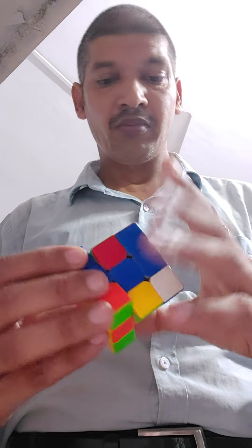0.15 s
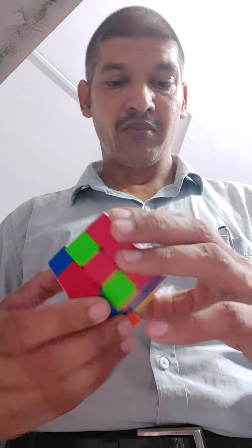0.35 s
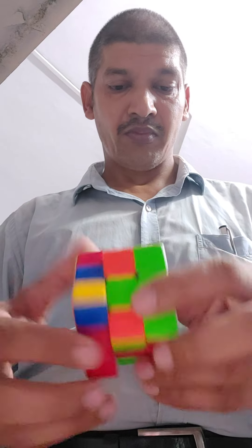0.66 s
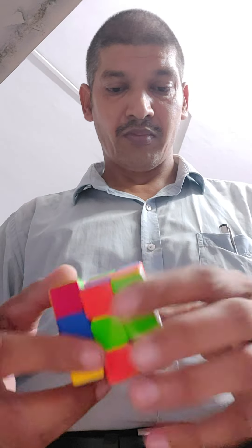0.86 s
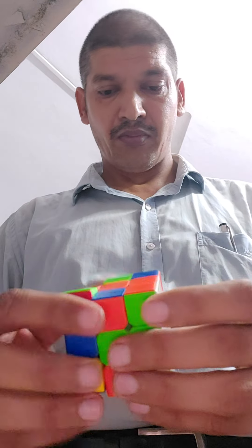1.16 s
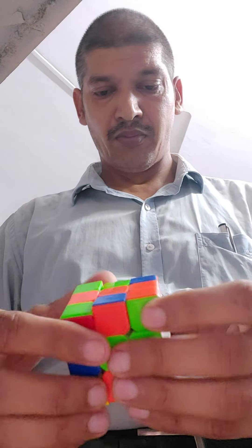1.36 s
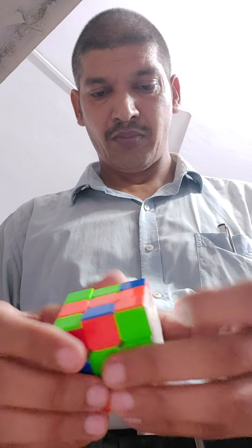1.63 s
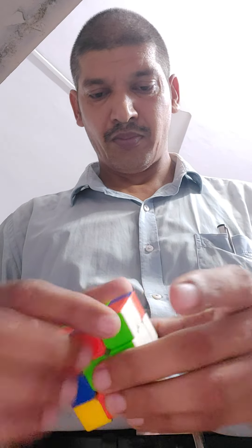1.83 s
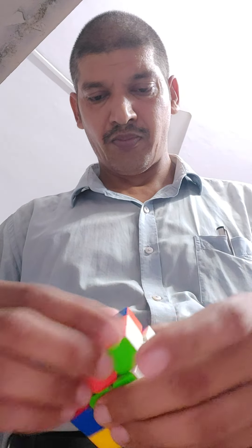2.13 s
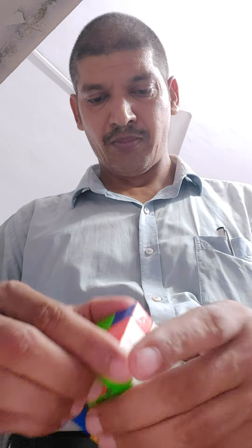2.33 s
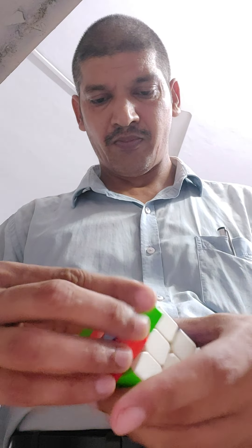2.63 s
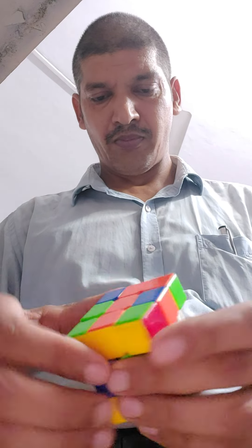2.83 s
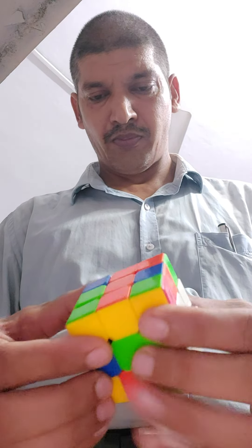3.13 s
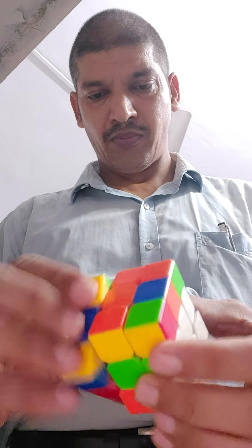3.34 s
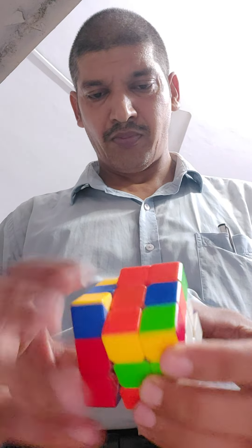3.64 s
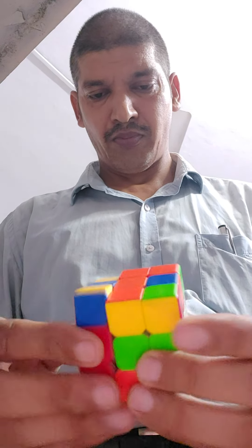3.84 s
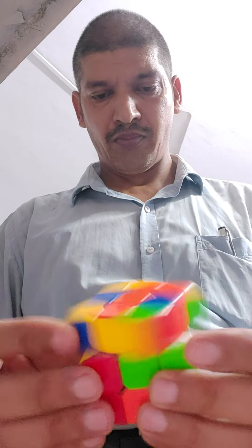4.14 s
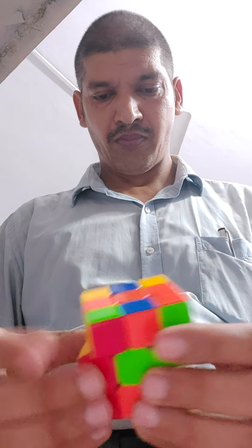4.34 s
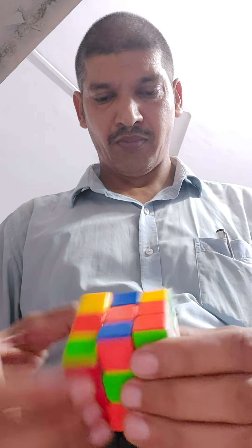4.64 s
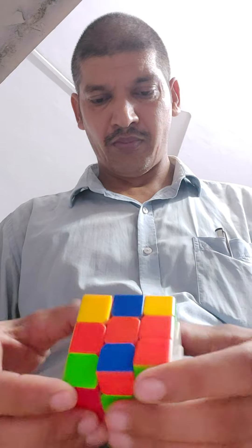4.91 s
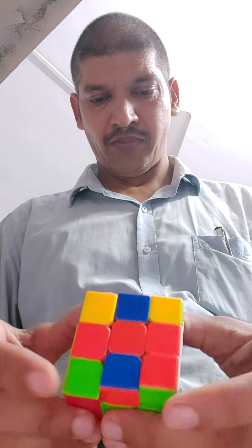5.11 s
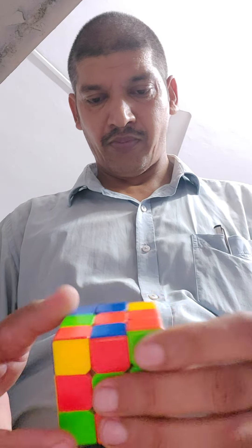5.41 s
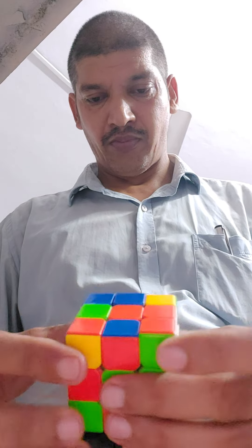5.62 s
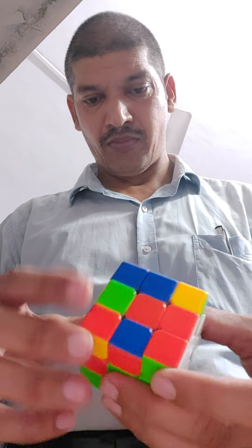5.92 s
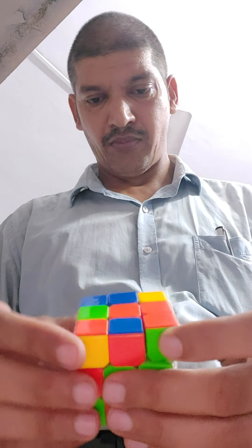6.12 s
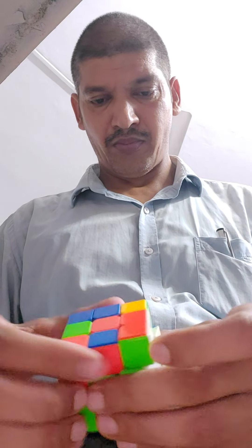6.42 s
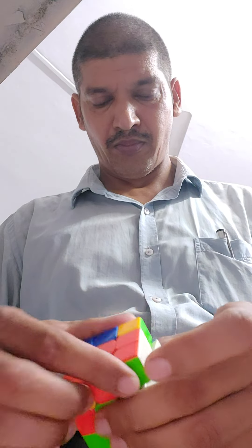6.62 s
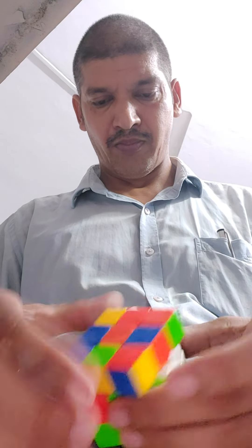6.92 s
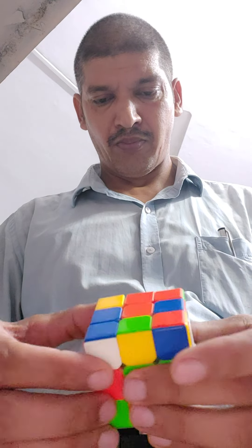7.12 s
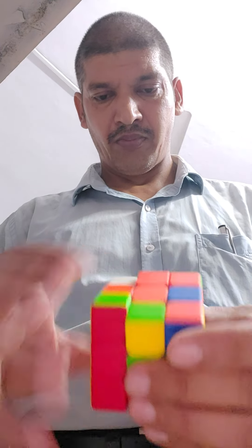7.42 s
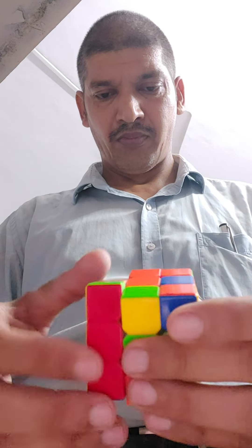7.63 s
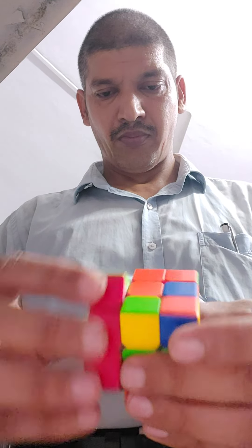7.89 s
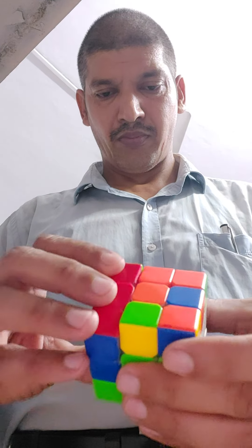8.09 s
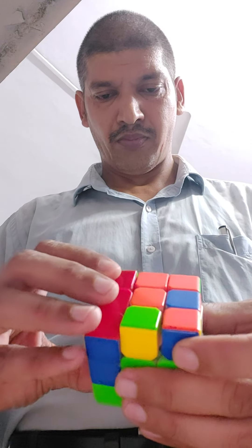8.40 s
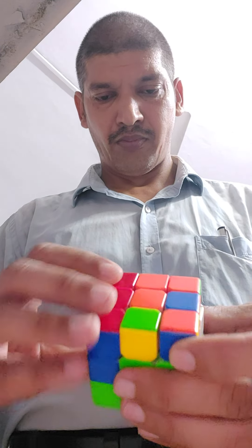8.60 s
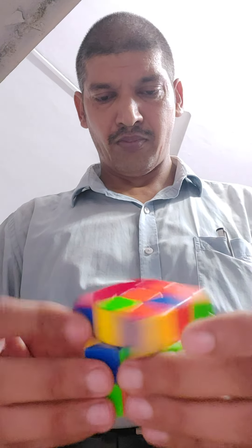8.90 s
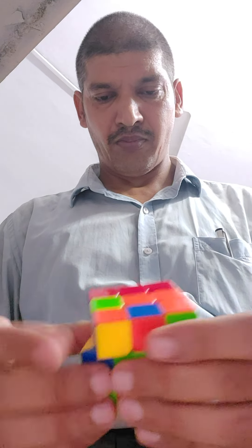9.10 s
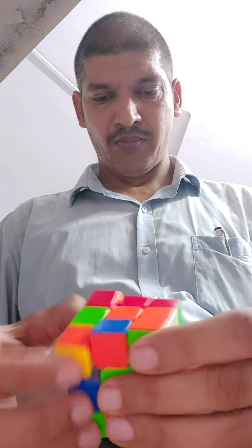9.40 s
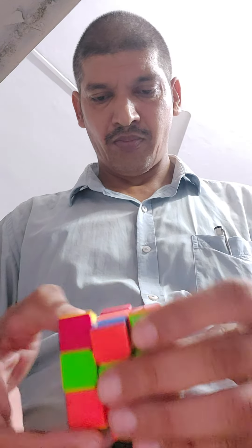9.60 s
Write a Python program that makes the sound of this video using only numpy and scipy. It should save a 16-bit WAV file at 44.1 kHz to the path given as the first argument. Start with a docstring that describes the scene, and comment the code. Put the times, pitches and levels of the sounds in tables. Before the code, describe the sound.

Very close to the microphone, hands turn a plastic puzzle cube. Bright, hollow clacks and brief dry scrapes come in irregular bursts, with an especially sharp snap near 1.6 seconds, busy turning from two to five, sparser clicks around six and eight, and a strong final flurry. A small hard room adds short reflections, and a fan hums low and steady underneath. The cube sits toward the right.

```python
"""A plastic puzzle cube is twisted by hand just above a phone in a small hard room.
Clacks are short noise rattles, scrapes are dense random grains; ticks are small clacks that follow the scrapes.
All ring the resonances of the hollow pieces, and four walls return diffuse tails.
A fan adds air noise and wavering drones in the low room resonances. The right port is nearer the cube."""
import sys
import numpy as np
from scipy import signal
from scipy.fft import rfft, irfft, next_fast_len
from scipy.io import wavfile
from scipy.ndimage import uniform_filter1d

SR = 44100
rng = np.random.default_rng(int(sys.argv[2]) if len(sys.argv) > 2 else 0)


def generate_wav(signal):
    """Clip the signal to [-1, 1] and save it as 16-bit WAV at the path in sys.argv[1]."""
    frames = np.transpose(np.atleast_2d(signal))
    scaled = np.clip(frames, -1, 1) * 32767
    pcm = np.round(scaled).astype(np.int16)
    wavfile.write(sys.argv[1], SR, pcm)


N = 429975  # samples

# fan drones in the room resonances: (centre [Hz], width [Hz], rms level at the right port [dB])
DRONES = [(100.54, 8.04, -48), (104, 8.1, -54), (114.4, 12, -51), (156.8, 8, -52), (197.1, 10, -55),
          (464, 20, -76), (668, 14, -75.5), (855, 14, -83.5)]
# spectrum of the fan's air noise: (frequency [Hz], relative density [dB])
AIR_SPECTRUM = [(20, -27), (34, -14), (50, -5), (90, 2), (180, 1.5), (300, -10.5), (500, -18.5), (900, -29),
                (1300, -42), (1700, -43), (3200, -50.5), (4200, -46), (6500, -45), (9500, -50),
                (16000, -45)]
# scrapes of a turning layer: (start [s], swell [s], fade [s], level [dB])
TURN_SCRAPES = [(0.364, 0.053, 0.049, -57), (0.5, 0.047, 0.053, -72.5), (0.701, 0.04, 0.017, -51),
                (0.846, 0.029, 0.047, -51), (1.04, 0.026, 0.033, -67), (1.095, 0.065, 0.025, -56),
                (1.279, 0.061, 0.093, -55), (1.491, 0.051, 0.022, -57), (1.534, 0.064, 0.026, -49.5),
                (1.63, 0.0079, 0.015, -30.5), (1.99, 0.031, 0.044, -52.5), (2.047, 0.03, 0.085, -40),
                (2.226, 0.019, 0.049, -48.5), (2.29, 0.014, 0.096, -47), (2.495, 0.045, 0.03, -57),
                (2.558, 0.059, 0.016, -40.5), (2.63, 0.021, 0.036, -36), (2.685, 0.022, 0.044, -38),
                (2.94, 0.03, 0.033, -58.5), (2.985, 0.016, 0.015, -44.5), (3.05, 0.033, 0.17, -49.5),
                (3.31, 0.13, 0.038, -40), (3.585, 0.025, 0.055, -35), (3.851, 0.023, 0.06, -53),
                (3.948, 0.034, 0.013, -53.5), (4.086, 0.042, 0.025, -63), (4.21, 0.073, 0.023, -35.5),
                (4.554, 0.027, 0.027, -45.5), (4.695, 0.073, 0.035, -40), (4.936, 0.021, 0.034, -41.5),
                (4.99, 0.02, 0.058, -54), (5.132, 0.011, 0.029, -48.5), (5.264, 0.076, 0.062, -39.5),
                (5.645, 0.011, 0.02, -66.5), (5.815, 0.014, 0.06, -73), (6.205, 0.041, 0.022, -52),
                (6.484, 0.027, 0.029, -46), (6.63, 0.041, 0.06, -67.5), (6.73, 0.011, 0.034, -63.5),
                (6.811, 0.02, 0.12, -42), (7.177, 0.028, 0.041, -44.5), (7.363, 0.077, 0.045, -38),
                (7.89, 0.0096, 0.04, -69.5), (7.962, 0.11, 0.049, -45.5), (8.39, 0.027, 0.016, -65.5),
                (8.427, 0.045, 0.011, -51), (8.545, 0.016, 0.061, -56.5), (8.68, 0.0075, 0.036, -62),
                (8.797, 0.042, 0.031, -66), (8.956, 0.032, 0.014, -46), (8.986, 0.056, 0.033, -37.5),
                (9.08, 0.11, 0.2, -69), (9.308, 0.027, 0.059, -42.5), (9.398, 0.053, 0.04, -53.5),
                (9.461, 0.037, 0.12, -46), (9.565, 0.022, 0.049, -30.5), (9.686, 0.024, 0.034, -40.5),
                (9.734, 0.023, 0.0055, -40)]
# resonances of the hollow pieces: (centre [Hz], width [Hz], relative level [dB])
PIECE_MODES = [(443, 390, -16), (744, 158, -5), (973, 155, -5), (1434, 305, -1), (2010, 860, 0),
               (2765, 1110, -0.5), (3620, 680, 0), (5440, 1640, 4), (6100, 1580, 6), (7210, 1250, 1),
               (8520, 310, -2.5), (10000, 3800, -2.5), (13800, 2300, -0.5), (15400, 280, 0.5)]
# room decay by 60 dB: (frequency [Hz], time [s])
ROOM_DECAY = [(500, 0.91), (2000, 0.5), (6000, 0.46), (12000, 0.41)]
# pieces snapping past each other: (time [s], blow level [dB], hollow knock under 2 kHz [dB])
SNAPS = [(0.013, -36.5, -23), (0.2456, -50.5, -30), (0.3412, -39.5, -15), (0.3798, -37.5, -22),
         (0.4127, -43, -5), (0.439, -41.5, -25), (0.673, -39.5, -25), (0.7435, -42, -8), (0.766, -42.5, -8),
         (0.8503, -24, -7), (0.86, -24, -10), (0.9356, -37.5, -9), (1.1034, -36, -20), (1.1242, -45, -12),
         (1.152, -42, 3), (1.2276, -37.5, -1.5), (1.496, -38, -6), (1.521, -37.5, -6), (1.571, -36, -10),
         (1.6331, -15, -11), (1.6413, -16.5, -11), (1.651, -25, -8.5), (1.96, -47.5, -8), (2.031, -44, -7),
         (2.1163, -28, -2), (2.1506, -34, 10), (2.172, -27, -22), (2.275, -36.5, -17), (2.302, -39, 10),
         (2.38, -51, -8), (2.4277, -41.5, -8), (2.474, -46, -2), (2.497, -40.5, -15), (2.5176, -34.5, -22),
         (2.5364, -35.5, -9), (2.563, -38, -6), (2.612, -34, -6), (2.655, -29, -4), (2.6925, -29, -11),
         (2.7046, -23.5, 1), (2.787, -29, 1), (2.7945, -36.5, -10), (2.81, -44, -1), (2.826, -51, -5),
         (2.9386, -46, -18), (3.0015, -36.5, -17), (3.059, -43.5, 9), (3.093, -37, 12), (3.135, -42, -2),
         (3.183, -40, 2), (3.283, -45.5, 8), (3.3628, -29, 2), (3.42, -37.5, 17), (3.4323, -28.5, -1),
         (3.4825, -33.5, -23), (3.4948, -35.5, -17), (3.5618, -32, 5), (3.5676, -31.5, 2),
         (3.595, -19, -19), (3.6236, -18.5, -5), (3.6964, -30, -23), (3.7045, -30.5, -5), (3.727, -43, 1),
         (3.743, -42, 13), (3.7572, -34.5, 7), (3.819, -47.5, 14), (3.8686, -27, -17), (3.911, -35.5, -20),
         (3.953, -33.5, -23), (3.9916, -35, -20), (4.0943, -40.5, 0), (4.1077, -42, -3), (4.129, -47, 12),
         (4.2352, -26.5, -8), (4.2752, -18, 1.5), (4.2783, -40, -18), (4.408, -33.5, -19),
         (4.5191, -22.5, -1), (4.693, -41, -24), (4.7187, -30.5, -16), (4.7847, -39, -4), (4.834, -36, 5.5),
         (4.9168, -43, -23), (4.9231, -39.5, 14.5), (4.9833, -21.5, 0), (5.005, -39, -16),
         (5.086, -38.5, -13), (5.1434, -41, -7), (5.3319, -25, 7), (5.3732, -36, -9), (5.383, -41, -18),
         (5.4, -47, -2), (5.465, -55, -5.5), (5.5424, -41.5, -1), (5.623, -47.5, 6.5),
         (5.797, -60.5, -19.5), (5.813, -52, -18), (6.021, -65.5, 7), (6.243, -25.5, 1), (6.311, -35.5, -5),
         (6.3345, -37.5, 4.5), (6.522, -41, 14.5), (6.593, -31, -16), (6.637, -51, 1), (6.7763, -46, -3),
         (6.8089, -38, -17), (6.8287, -26, -3), (6.877, -34, -2), (6.9288, -38, -19), (6.9534, -30.5, 6.5),
         (7.041, -41.5, -7), (7.1261, -36.5, -1), (7.1574, -37.5, 8), (7.2122, -41, -1),
         (7.3507, -40.5, -6), (7.3882, -25, -19), (7.422, -22.5, -20), (7.462, -24, -2.5),
         (7.5058, -25.5, -21.5), (7.9694, -38, -17), (8.188, -55.5, -10), (8.2961, -40.5, -15),
         (8.4982, -45, -4.5), (8.7277, -41.5, -12), (8.814, -40.5, -23), (8.899, -36, -2),
         (8.964, -45, -11), (9.019, -30, 3), (9.035, -27.5, 5.5), (9.06, -36, 12.5), (9.188, -40, 7),
         (9.2806, -36.5, 8.5), (9.4063, -43, -19), (9.441, -45, -15), (9.474, -24.5, -20),
         (9.4959, -24.5, -19), (9.5745, -25, 10), (9.5985, -17.5, 1), (9.6274, -16.5, 0), (9.692, -28, 5)]

AIR_DB = -50.5  # rms before the port tilt
ROOM_DB, WALLS = -11.5, 4
LEFT_LAG_S = 0.00004  # the left port hears the cube later
TOP_HZ = 15750
LOW_HZ, HIGH_HZ = 2000, 9000  # edges of the middle resonances
# scrape as a piece slides home: lead before the blow, swell, fade, level re the blow
SEAT_LEAD_S, SEAT_SWELL_S, SEAT_FADE_S, SEAT_DB = 0.0049, 0.007, 0.016, -19
SCRAPE_LOW_DB, SCRAPE_HIGH_DB = -6.5, -4.5  # bands under LOW_HZ and over HIGH_HZ
EDGE_DB, EDGE_SCATTER_DB = -12, 2  # edge tick over HIGH_HZ in a clack
PAN_DB, PAN_SCATTER_DB = -9, 2.5  # left minus right in a clack
# ticks: blow re the scrape level, hollow knock under LOW_HZ
TICKS_PER_S, TICK_DB, TICK_SCATTER_DB = 70, 0, 2
TICK_KNOCK_DB, TICK_KNOCK_SCATTER_DB = -3.5, 4.5
SETTLE_WINDOW_S, SETTLE_DB = 0.3, -12.5  # loose pieces tick faintly around each turn


def undb(db):
    """Amplitude ratio of a level in dB."""
    return 10 ** (np.asarray(db) / 20)


def level(x, db):
    """Scale to an rms level."""
    return x * undb(db) / np.sqrt(np.mean(x ** 2))


def on_log(hz, table):
    """Read a (Hz, value) table on a log-frequency axis."""
    table_hz, values = np.transpose(table)
    return np.interp(np.log(hz + 1), np.log(table_hz), values)


def mode(hz, centre_hz, width_hz):
    """Response of one resonance, 1 at its centre."""
    return 1j * hz * width_hz / (centre_hz ** 2 - hz ** 2 + 1j * hz * width_hz)


def shape(x, response):
    """Filter by a function of frequency."""
    size = next_fast_len(N + SR)
    hz = np.arange(size // 2 + 1) * SR / size
    return irfft(rfft(x, size) * response(hz), size)[..., :N]


def walk(rate_hz):
    """Random levels held 1 / rate_hz and slewed; spread near 1."""
    hold = int(SR / rate_hz)
    steps = np.repeat(rng.standard_normal(N // hold + 1), hold)
    return 1.2 * uniform_filter1d(steps, hold)[:N]


def fan(left_db=-1.5):
    """Air noise, alike at both ports only in the low notes, with narrow wavering drones."""
    mid, side = shape(rng.standard_normal((2, N)), lambda hz: undb(on_log(hz, AIR_SPECTRUM)))
    side = shape(side, lambda hz: np.abs(hz / (hz + 600j)) + 0.47 / (1 + (hz / 45) ** 2))
    air = level(np.array([mid + side, mid - side]), AIR_DB)
    air = shape(air, lambda hz: undb(np.array([[-3.5], [4.3]]) * hz / (hz + 500)))
    drone = 0
    for centre_hz, width_hz, db in DRONES:
        noisy = shape(rng.standard_normal(N), lambda hz: mode(hz, centre_hz, width_hz) ** 2)
        pitch_hz = centre_hz + 0.1202 * width_hz * walk(4)
        steady = np.sin(2 * np.pi * np.cumsum(pitch_hz) / SR)  # the motor's share holds its size
        drone = drone + level(level(noisy, -7.5) + 1.2 * steady, db)
    return air + drone * undb(np.array([[left_db], [0]]))


def sliding(rows, round_off=0.99):
    """How hard the faces rub: each row swells and fades with the speed of the twist."""
    t, push = np.arange(N) / SR, np.zeros(N)
    for start_s, swell_s, fade_s, db in rows:
        end_s = start_s + swell_s + fade_s
        span = slice(int(max(start_s, 0) * SR), int(end_s * SR))
        ramp = np.interp(t[span] - start_s, [0, swell_s, swell_s + fade_s], [0, 1, 0])
        push[span] += undb(db) * np.sin(np.pi / 2 * ramp) ** round_off
    return push


def scrape(push, alike=(0.8, 0.5, 0.3), pan_db=(-11, -10, -6), drift_db=1.07):
    """Dense stick-slip grains between the sliding faces ring the pieces in three bands."""
    slips_per_s, size_db, most, patchy_db, own_db = 6000, 3.0, 4, 1.8, 1.8
    slips = (rng.random((2, N)) < slips_per_s / SR) * rng.standard_normal((2, N))
    sizes = undb(size_db * np.minimum(rng.exponential(size=(2, N)), most))
    grains = level(slips * sizes * undb(patchy_db * (walk(70) + walk(250))), 0)
    bands = zip([SCRAPE_LOW_DB, 0, SCRAPE_HIGH_DB], alike, pan_db,
                [0, LOW_HZ, HIGH_HZ], [LOW_HZ, HIGH_HZ, SR])
    out = 0
    for part_db, share, pan, low_hz, high_hz in bands:
        def response(hz):
            return sum((-1) ** k * undb(db) * mode(hz, centre_hz, width_hz)
                       for k, (centre_hz, width_hz, db) in enumerate(PIECE_MODES)
                       if low_hz <= centre_hz < high_hz)
        unit = np.sqrt(np.mean(np.abs(response(np.linspace(0, SR / 2, 500))) ** 2))
        left = share * grains[0] + np.sqrt(1 - share ** 2) * grains[1]
        pair = np.array([left, grains[0]]) * undb(np.array([[pan], [-pan]]) / 2)
        # large and small parts catch at their own moments
        catch = undb(part_db + own_db * walk(120) + drift_db * walk(11))
        out = out + shape(pair * push * catch, response) / unit
    return out


def room(sends, first_s=0.0011):
    """Each wall returns its own diffuse tail to each port; the treble dies sooner."""
    t = np.arange(SR // 2 + SR // 4) / SR
    hz, s, tail = signal.stft(rng.standard_normal((2, WALLS, len(t))), SR, nperseg=256)
    decay = undb(-60 * s / on_log(hz, ROOM_DECAY)[:, None])
    tail = signal.istft(tail * decay, SR, nperseg=256)[1][..., :len(t)]
    tail = tail * (1 - np.exp(-t / first_s))
    tail = tail / np.sqrt(np.sum(tail ** 2, axis=(1, 2), keepdims=True))
    wet = signal.fftconvolve(sends[None], tail, axes=2).sum(axis=1)[:, :N]
    return undb(ROOM_DB + np.array([[-2.5], [2.5]])) * wet


def clacks(s, blow_db, low_db, rattle_s=0.0014, alike_hz=4000, scatter_db=2.5, detune=0.098):
    """Millisecond rattles of contacts ring other pieces each time. Rows: left, right, walls."""
    size, count = 1024, len(s)
    t, hz = np.arange(size) / SR, np.arange(size // 2 + 1) * SR / size
    noise = rng.standard_normal((count, 2 + WALLS, size))
    pitch, weight = rng.standard_normal((2, len(PIECE_MODES), 1 + WALLS, count, 1))
    edge, place = rng.standard_normal((2, count))
    high_db = EDGE_DB + EDGE_SCATTER_DB * edge
    pan_db = PAN_DB + PAN_SCATTER_DB * place
    envelope = (1 - np.exp(-t / 0.00048)) * np.exp(-t / rattle_s)
    rattles = [rfft(noise[:, k] * envelope) for k in range(2 + WALLS)]
    alike = 1 / (1 + hz / alike_hz)  # in the treble the far port hears other faces
    rattles[0] = alike * rattles[1] + np.sqrt(1 - alike ** 2) * rattles[0]
    ring = 0
    for k, (centre_hz, width_hz, db) in enumerate(PIECE_MODES):
        part_db = low_db if centre_hz < LOW_HZ else high_db if centre_hz > HIGH_HZ else 0 * s
        gain = undb(db + part_db[:, None] + scatter_db * weight[k])
        ring = ring + (-1) ** k * gain * mode(hz, centre_hz * (1 + detune * pitch[k]), width_hz)
    middle = (hz > LOW_HZ) & (hz < HIGH_HZ)  # this band sets the blow level
    out = np.zeros((2 + WALLS, N + size))
    for channel, side in enumerate([0.5, -0.5] + WALLS * [0]):
        sound = rattles[channel] * ring[max(channel - 1, 0)]  # every wall faces other pieces
        energy = np.sum(np.abs(sound[:, middle]) ** 2, axis=1)
        strength = np.sqrt(energy / size / (rattle_s * SR / 2))
        sound = irfft(sound, size) * (undb(blow_db + side * pan_db) / strength)[:, None]
        for start, row in zip((s * SR).astype(int), sound):
            out[channel, start:start + size] += row
    return out[:, :N]


def ticks(push):
    """Small blows at uneven moments, their strength scattered around the rubbing just then."""
    count = TICKS_PER_S * N // SR
    s = (np.arange(count) + rng.random(count)) / TICKS_PER_S
    blow, knock = rng.standard_normal((2, count))
    push_db = 20 * np.log10(np.abs(push[(s * SR).astype(int)]) + 1e-9)
    blow_db = push_db + TICK_DB + TICK_SCATTER_DB * blow
    return clacks(s, blow_db, TICK_KNOCK_DB + TICK_KNOCK_SCATTER_DB * knock)


def scene():
    """Cube, its echo in the room and the fan."""
    drone = fan()
    turning = sliding(TURN_SCRAPES)
    seating = sliding([(s - SEAT_LEAD_S, SEAT_SWELL_S, SEAT_FADE_S, db + SEAT_DB) for s, db, _ in SNAPS])
    rub = scrape(turning + seating)
    settling = undb(SETTLE_DB) * uniform_filter1d(turning, int(SETTLE_WINDOW_S * SR))
    blows = clacks(*np.transpose(SNAPS)) + ticks(turning + settling)
    lag_s = np.array([[LEFT_LAG_S], [0]])
    near = shape(blows[:2] + rub, lambda hz: np.exp(-2j * np.pi * hz * lag_s))
    # the left port lifts the treble a little
    near[0] = shape(near[0], lambda hz: undb(0.55 * hz / (hz + 7000)))
    return near + room(blows[2:] + rub.mean(axis=0)) + drone


def record(dry):
    """A steep elliptic low-pass at TOP_HZ ends the band."""
    return signal.sosfilt(signal.ellip(12, 0.2, 95, TOP_HZ, fs=SR, output="sos"), dry)


dry = scene()
out = record(dry)
generate_wav(out)
```